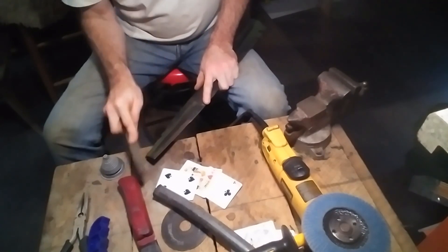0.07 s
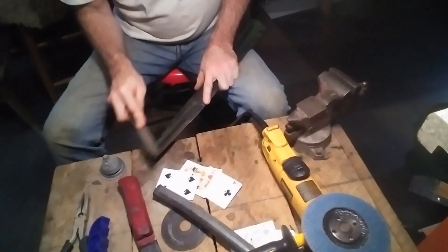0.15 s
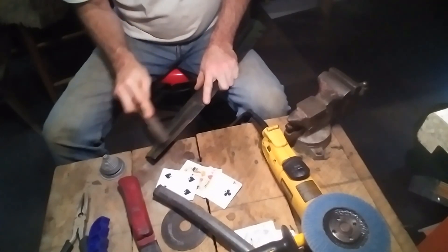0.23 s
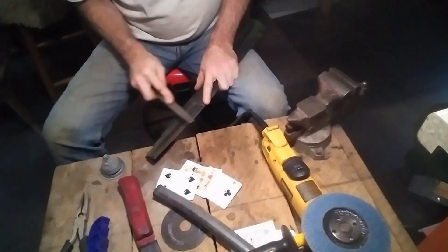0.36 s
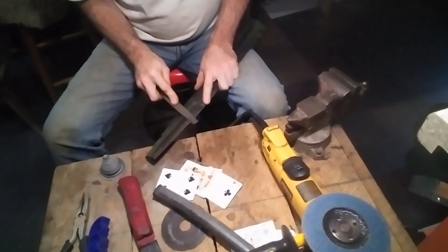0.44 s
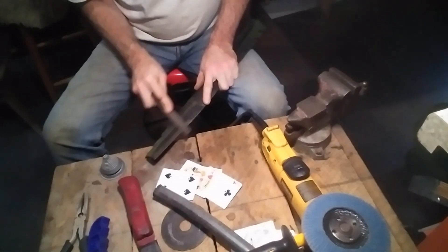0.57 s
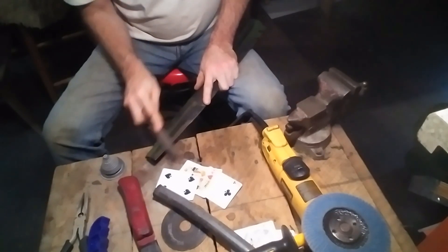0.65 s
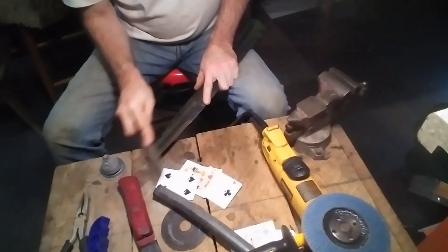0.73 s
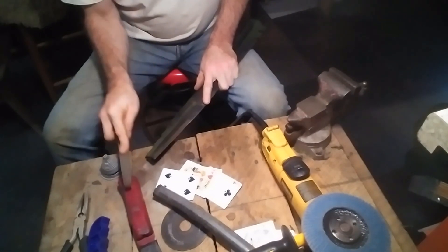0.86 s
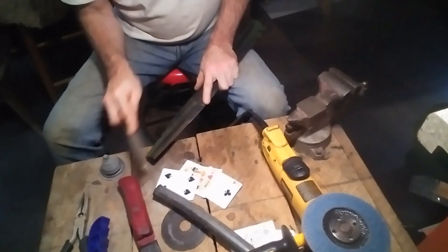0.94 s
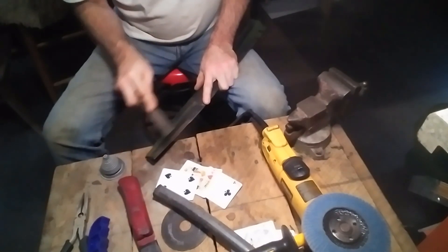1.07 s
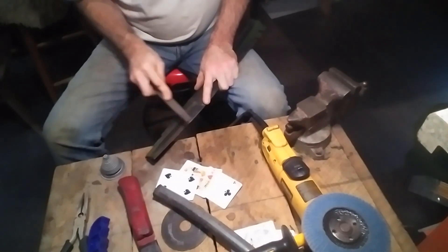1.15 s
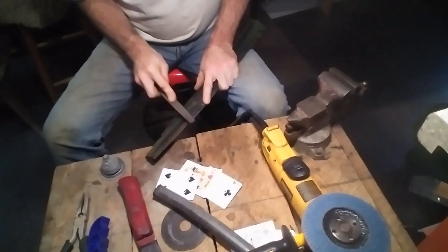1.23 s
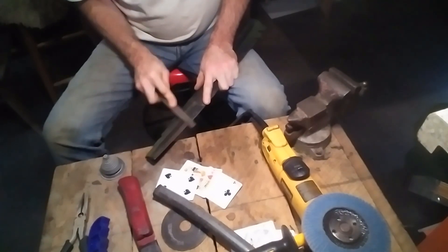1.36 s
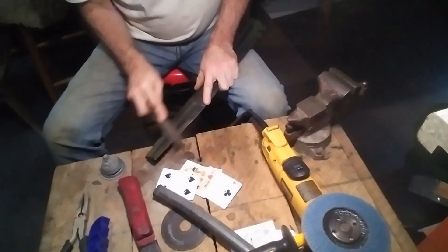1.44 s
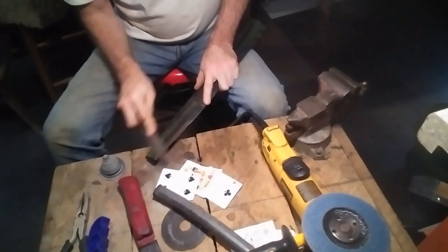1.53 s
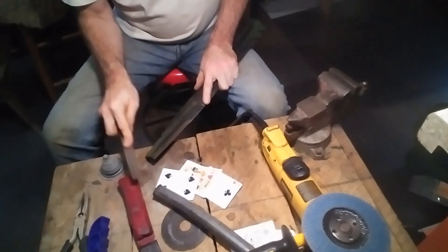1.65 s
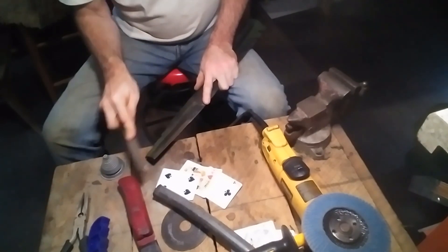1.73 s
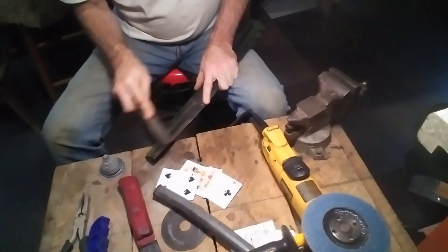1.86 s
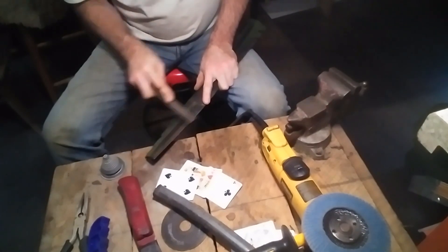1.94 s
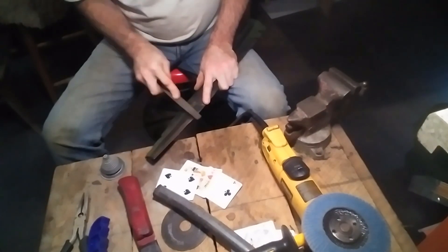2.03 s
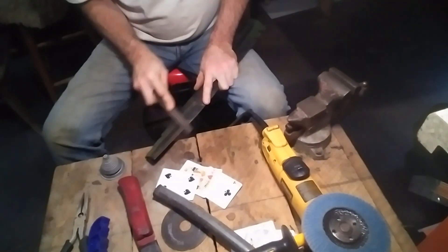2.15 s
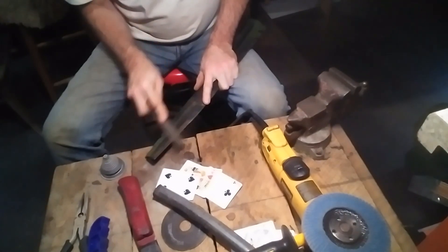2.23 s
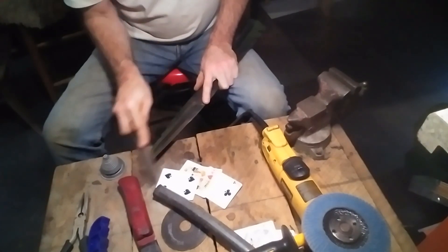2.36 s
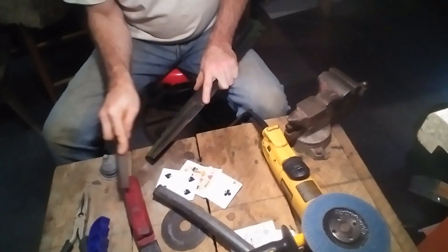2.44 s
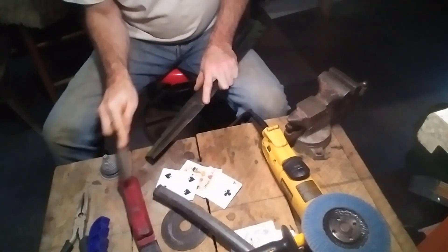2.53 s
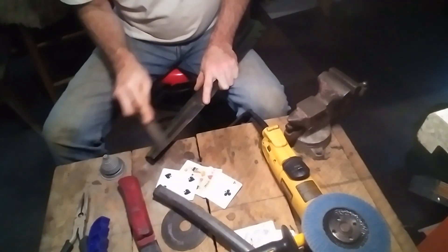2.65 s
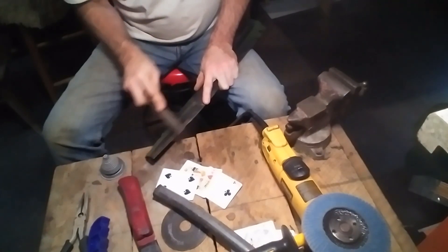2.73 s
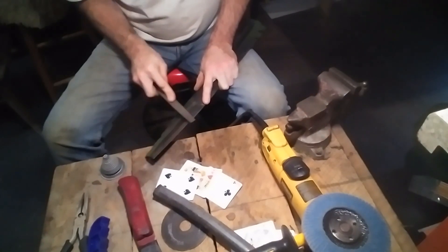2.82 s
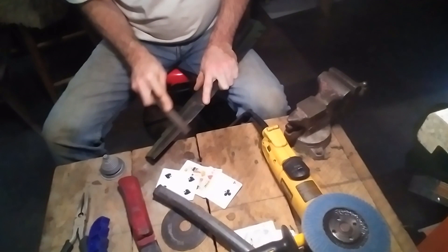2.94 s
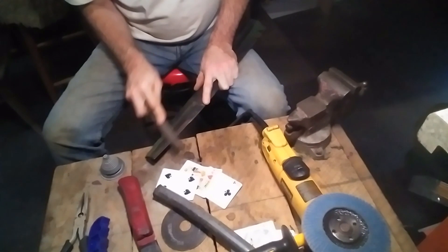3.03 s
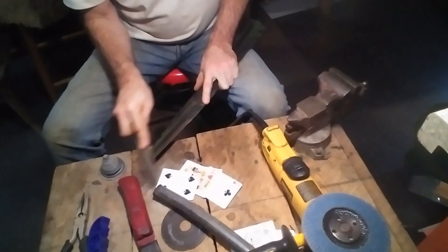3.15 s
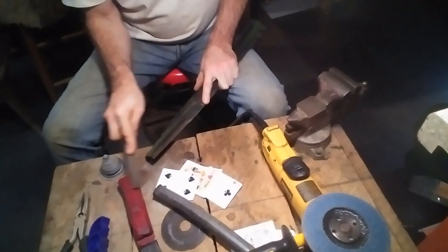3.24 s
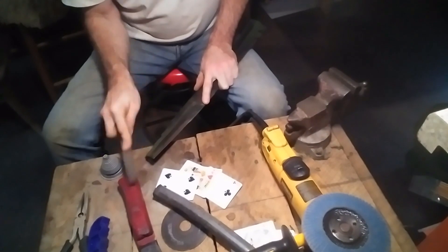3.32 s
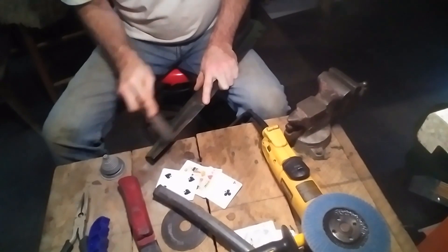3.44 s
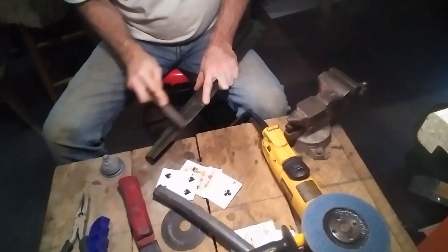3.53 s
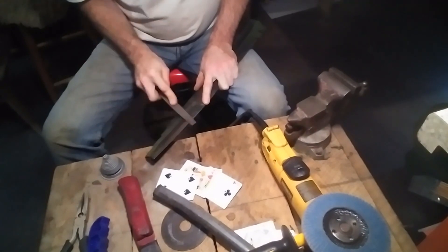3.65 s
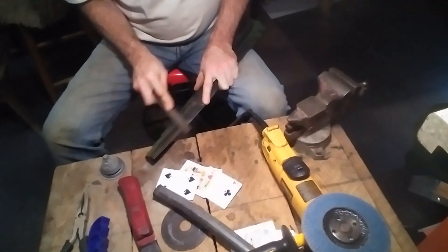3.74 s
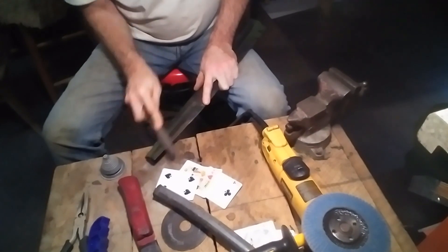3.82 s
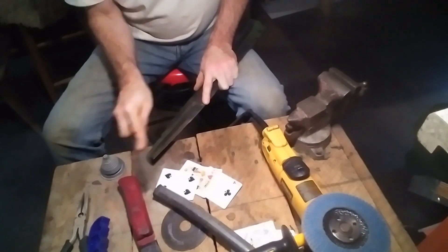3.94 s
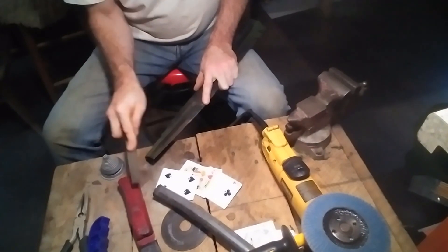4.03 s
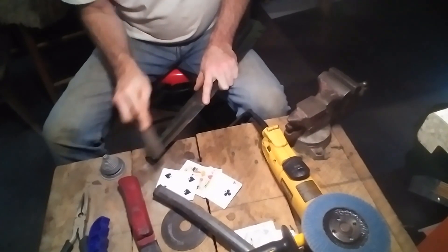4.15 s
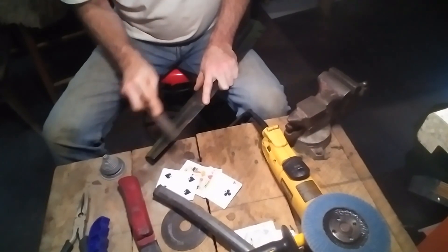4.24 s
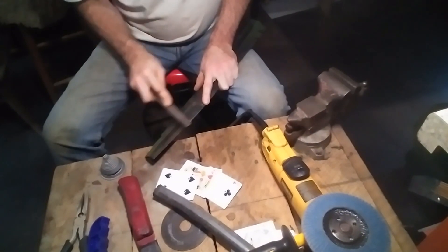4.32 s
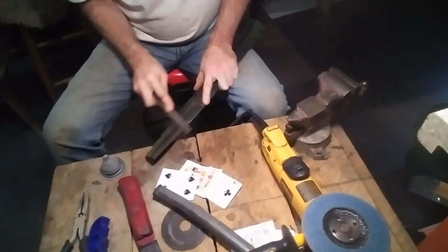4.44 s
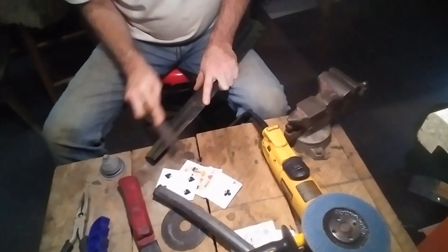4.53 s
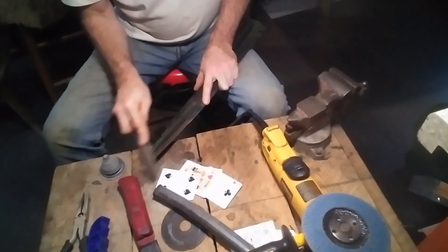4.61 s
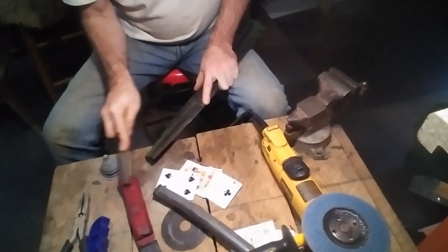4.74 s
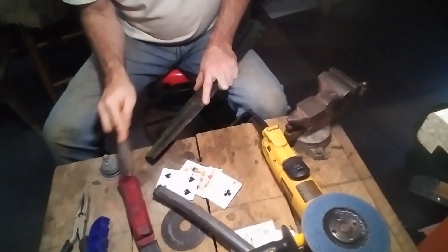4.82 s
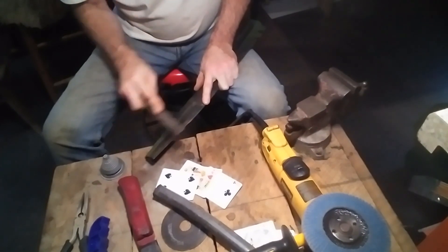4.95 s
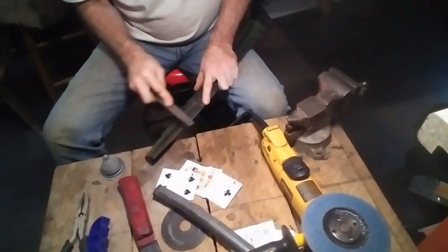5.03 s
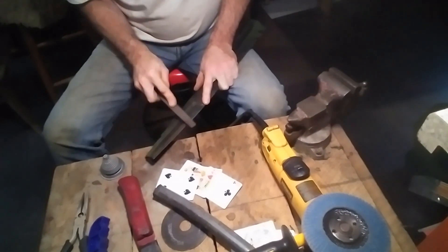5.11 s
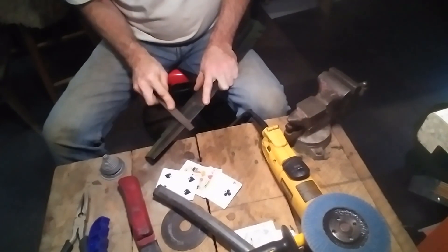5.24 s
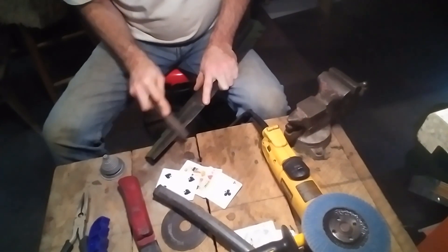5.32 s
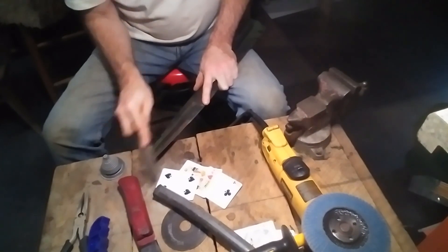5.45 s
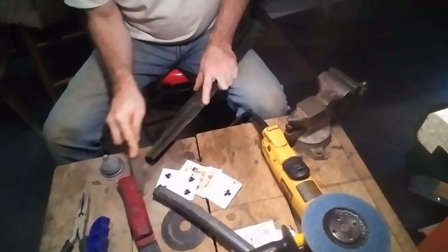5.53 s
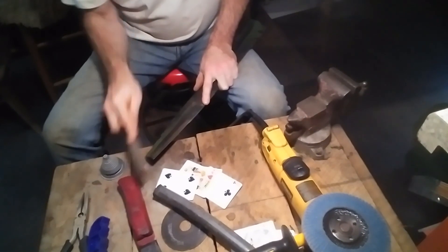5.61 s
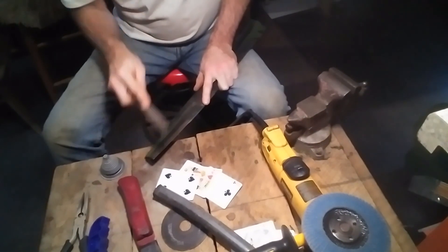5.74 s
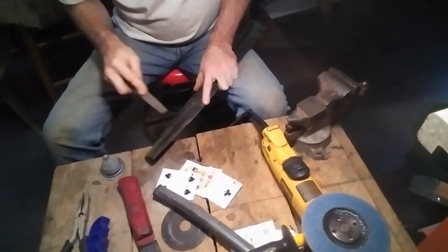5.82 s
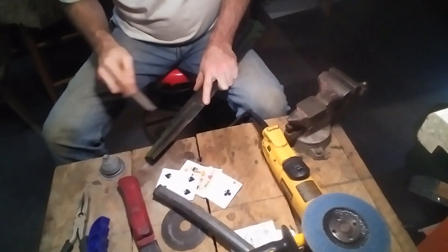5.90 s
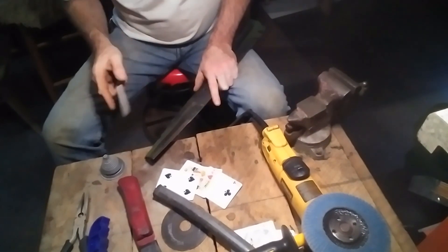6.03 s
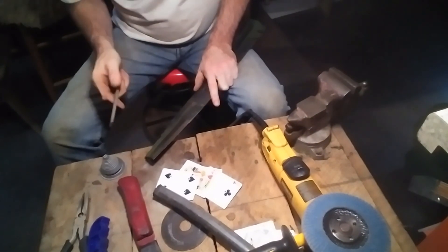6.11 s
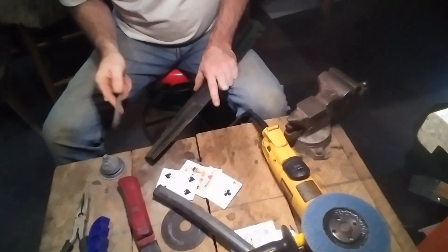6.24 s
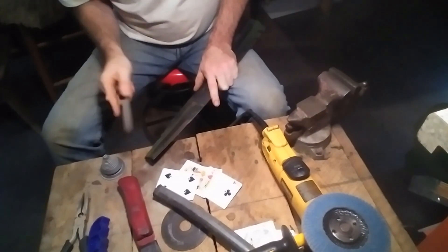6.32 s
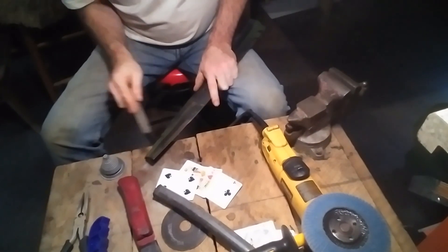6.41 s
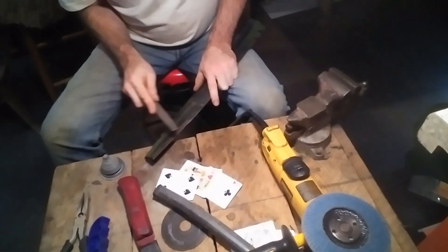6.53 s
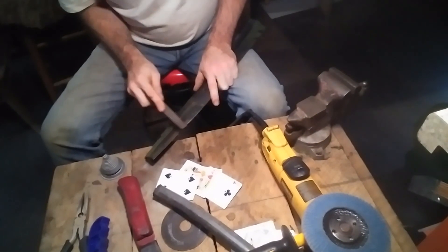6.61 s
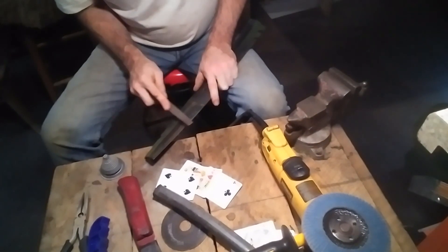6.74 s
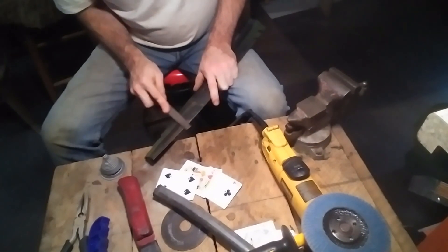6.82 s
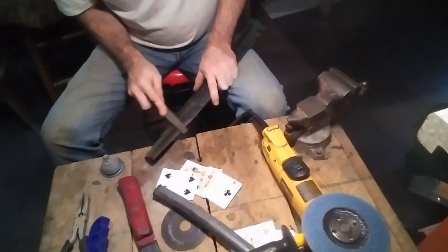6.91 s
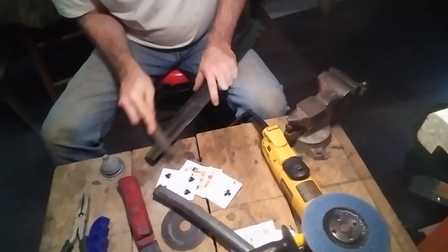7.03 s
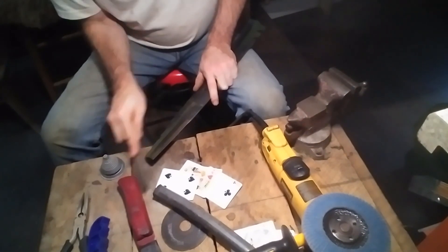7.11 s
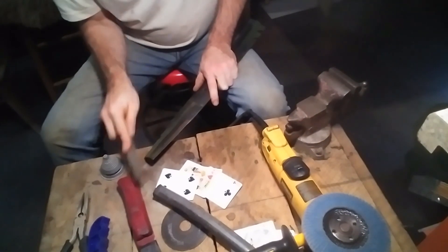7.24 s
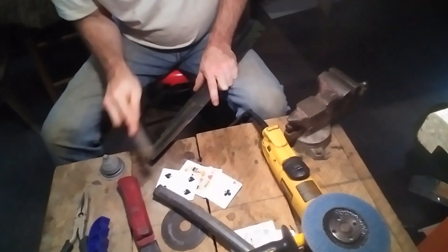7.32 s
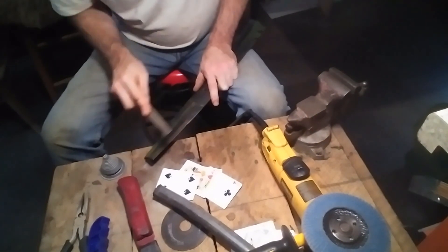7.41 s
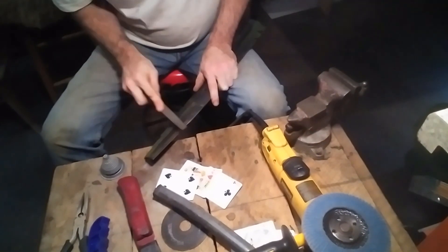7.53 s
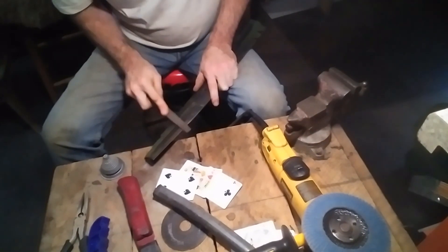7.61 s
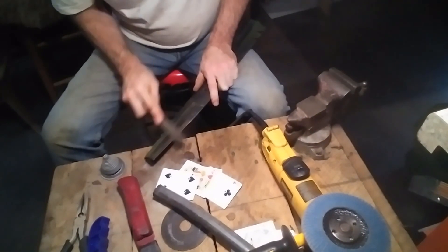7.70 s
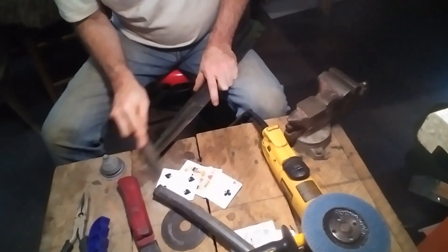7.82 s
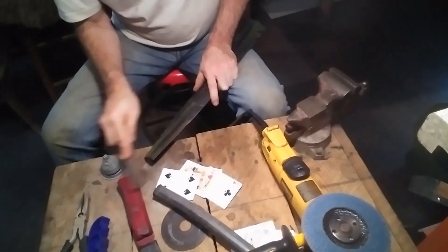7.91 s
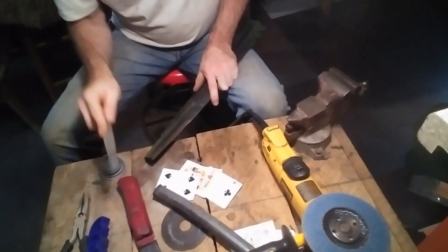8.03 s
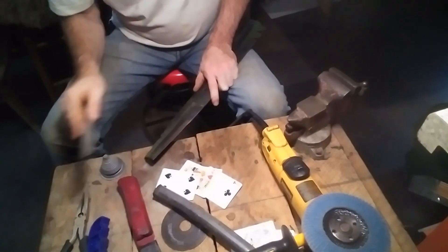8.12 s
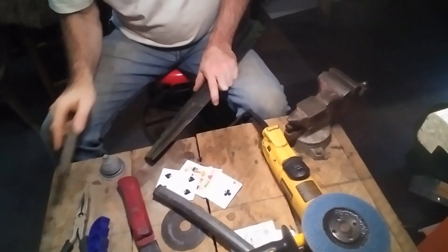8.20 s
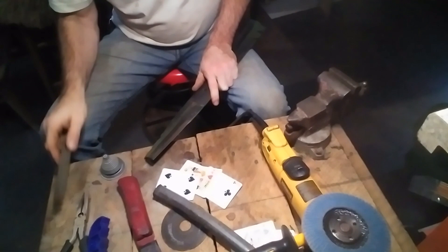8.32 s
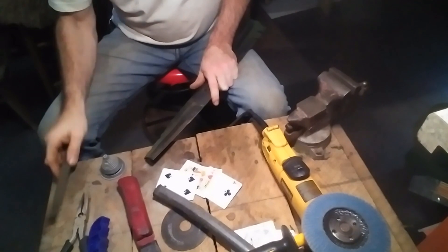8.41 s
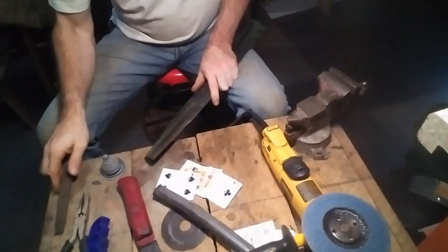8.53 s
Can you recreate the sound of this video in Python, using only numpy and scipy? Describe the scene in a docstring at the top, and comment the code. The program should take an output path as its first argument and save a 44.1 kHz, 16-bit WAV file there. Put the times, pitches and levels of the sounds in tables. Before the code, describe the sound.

A file stroke on a steel blade is already sounding at 0 s, loud and gritty, and ends by about 0.2. Seven more follow at about 0.65, 1.5, 2.3, 3.1, 3.85, 4.6 and 5.4 s, each a sharp steel clack with a tiny rebound, then roughly 0.3 s of dry, bright rasping with a rough mid-high whine and lower growl. Burrs snag, making small jerks. At 5.7 the file slips off with a short ringing clank, and steel knocks wood at 5.8. A pause holds only quiet air, faint cloth rustle and a barely audible tick. At 7.0 filing resumes, lighter then harsher, with a brief chattering squeal at 7.25-7.35, a clank at 7.36 and a duller knock at 7.45. The loudest landing clack, at 7.8, begins the last rasp, ending near 8.1; quiet room air remains. Short small-workshop echo throughout, close microphone, thin in deep bass.

```python
"""Ten rasping file strokes on the edge of a steel blade at a wooden bench; the first is already under way.
The rasp is a rain of tiny clicks into the blade, while two rows of teeth sing and growl at their own pitches.
The other nine land with a clack. Burrs catch the teeth, and once the blade chatters by sticking and slipping.
Twice the file slips off with a clank, then steel knocks on the bench. A sleeve rustles and the handle ticks.
The work echoes in a small workshop, over the noise of still room air."""
import sys
import numpy as np
from scipy import signal
from scipy.fft import rfft, irfft, next_fast_len
from scipy.io import wavfile

SR = 44100
rng = np.random.default_rng(int(sys.argv[2]) if len(sys.argv) > 2 else 0)


def output_pcm(signal):
    """Save a mono or channel-first signal as 16-bit PCM at the path in sys.argv[1].

    Samples are clipped to [-1, 1] before scaling.
    """
    pcm = np.clip(np.atleast_2d(signal).T, -1, 1) * 32767
    wavfile.write(sys.argv[1], SR, np.round(pcm).astype(np.int16))


N = 377665
TIME = np.arange(N) / SR

# pushes of the file: (start t/s, length t/s, rasp level/dB, change under a light hand/dB,
#   hand bears down at share 0-1, hiss level relative to other strokes/dB, song of fine teeth level/dB,
#   song strongest at share 0-1, growl of coarse teeth level/dB, sag of the growl f/Hz, final dig/dB)
STROKES = [ (-.12, 0.28, -27, -6.5, 0.6, -2.5, -25, .5, -24, 130.6, 1.5),
           (.668, 0.3, -31.5, -3.5, .5, -0.5, -26.5, .44, -30, 199.5, 9.5),
           (1.514, .269, -32.5, -5, .3, 0.5, -24.5, .44, -31.5, 79.83, 4.5),
           (2.29, 0.28, -32, 2, 0.4, -4, -26.5, .35, -29, 169.5, -0.5),
           (3.103, 0.27, -31.5, -1, 0.4, -4.5, -25.5, .38, -25.5, 338.7, -2),
           (3.869, .277, -33.5, -2, .45, -3, -23.5, .3, -29.5, 243, 1),
           (4.611, .241, -31.5, -2.5, 0.41, -0.5, -26.5, 0.4, -28, 129.1, 1),
           (5.39, 0.3, -32, -10, .5, .5, -30, .33, -31.5, 99.83, 5.5),
           (7.036, 0.31, -28.5, -16.5, 0.53, -3.5, -33.5, .12, -28.5, 281.3, 2.5),
           (7.82, 0.25, -32.5, -2.5, .38, -3, -31, .4, -32, 29.9, -3), ]
# resonances of the blade, or dead spots where the lift is negative: (f/Hz, width f/Hz, lift/dB)
BLADE = [(172, 21, 6), (230, 5.1, 5), (290, 8.5, 3), (564, 13, -7.5), (663, 130, 11), (770, 19, 11),
         (883, 47, 14.5), (984, 20, 3), (1035, 84, 6), (1206, 210, -13), (1300, 80, 9.5), (1363, 31, 5),
         (1470, 94, 8), (1630, 27, -7.5), (1842, 140, 9.5), (1960, 39, 3.5), (1985, 81, -4.5),
         (2403, 170, 8.5), (2756, 210, 6), (3490, 620, 8), (3967, 260, 11.5), (4470, 200, 5.5),
         (5720, 1100, 6.5), (7010, 60, 2), (7390, 790, 5.5), (8330, 330, 4.5)]
# tone colour of steel being struck: (f/Hz, level/dB)
CLACK = [(50, -29.5), (120, -15), (300, 2.5), (700, -3), (1100, 4), (1600, 7.5), (2700, -3.5), (3800, -7),
         (4900, -9.5), (7400, -6.5), (9500, -14.5), (13000, -28), (16000, -35.5)]


def from_db(db):
    """Decibels to a plain factor."""
    return 10 ** (np.asarray(db) / 20)


def rms_one(x):
    """Scaled to rms (average strength) 1."""
    return x / np.sqrt(np.mean(x ** 2) + 1e-20)


def at_hz(points, hz):
    """A curve over frequency, read on a log-frequency axis."""
    f, value = np.transpose(points)
    return np.interp(np.log(np.maximum(hz, 1)), np.log(f), value)


def band(x, low_hz, high_hz):
    """Keeps the sound between two frequencies (Butterworth band-pass)."""
    edges = [low_hz, min(high_hz, SR / 2 - 1000)]
    return signal.sosfilt(signal.butter(2, edges, "band", fs=SR, output="sos"), x + 1e-18)


def drift(rate):
    """Slow random wandering with rms 1, through `rate` new random points a second."""
    points = rng.standard_normal(N // 8)
    return rms_one(np.interp(TIME * rate, np.arange(len(points)), points))


def bump(x, centre, width):
    """A bell of height 1."""
    return np.exp(-np.minimum(((x - centre) / width) ** 2, 50))


def through(x, response):
    """Sends a sound through an impulse response (convolution), cut to length."""
    return signal.fftconvolve(x, response)[:N]


def body(spectrum, modes=(), size=16384):
    """Impulse response, of energy 1, of a broad spectrum with resonances standing on it."""
    hz = np.fft.rfftfreq(size, 1 / SR)
    level_db = at_hz(spectrum, hz)
    for f, width, lift in modes:
        level_db = level_db + lift / (1 + (2 * (hz - f) / width) ** 2)
    # minimum phase: the response starts at once, with nothing before the blow
    cepstrum = irfft(np.log(from_db(level_db)))[:size // 2]
    response = irfft(np.exp(rfft(2 * cepstrum, size) - cepstrum[0]))[:size // 2]
    return response / np.linalg.norm(response)


def ring(force, modes):
    """Each mode (f/Hz, level/dB, t60/s) rings as a dying sine."""
    t, response = TIME[:SR], 0
    for k, (hz, db, t60) in enumerate(modes):
        response = response + (-1) ** k * from_db(db - 60 * t / t60) * np.sin(2 * np.pi * hz * t)
    return through(force, response)


def impacts(times, levels_db, t60):
    """Each contact is a brief crunch of tiny collisions, falling by 60 dB in t60 seconds."""
    force, age = np.zeros(N), TIME[:SR // 8]
    for s, db in zip(times, levels_db):
        crunch = rng.choice([-1, 1], len(age)) * from_db(db - 60 * age / t60)
        force[int(s * SR):][:len(age)] += crunch
    return force


def pressure(lift_s=0.019, ease_s=0.0075, seat_s=0.04, catch_s=0.0013, flutter_db=1.5, wobble_db=2.0):
    """Force of the file on the edge: on during a stroke, easing off at its end, unsteady, jumping at burrs."""
    # burrs that catch the teeth: (t/s, extra force/dB, length t/s)
    burrs = [(.146, 0.5, 0.0076), (0.903, 3, 0.0081), (1.677, 5.5, 0.0085), (1.744, 4, 0.014),
             (2.403, 0, 0.0056), (3.133, 7.5, 0.0052), (3.186, 2, 0.0042), (3.251, 5.5, 0.011),
             (3.965, 2, 0.015), (4.023, 9, 0.0055), (4.125, 3, 0.0082), (4.744, 11, 0.0049),
             (4.793, 3, 0.005), (5.572, 7, 0.0041), (5.665, 6, 0.017), (7.086, 9, 0.0059),
             (7.164, 8.5, 0.024), (7.297, 8, 0.0042)]
    touching, burr_db = 0, 0
    for s, length, *_ in STROKES:
        touching = touching + np.interp(TIME - s, [-seat_s, 0, length - ease_s, length + lift_s], [0, 1, 1, 0])
    for s, db, length in burrs:
        corners = [s - catch_s, s, s + length / 2, s + 2 * length]
        burr_db = burr_db + np.interp(TIME, corners, [0, db, db, 0])
    return touching ** 2 * from_db(burr_db + flutter_db * drift(170) + wobble_db * drift(35))


def stroke_now():
    """The current stroke's settings at each sample, with its progress, hand speed, lightness and final dig."""
    bear_down_share = 0.11   # part of a stroke over which the hand's weight comes on
    start_speed, fastest_at_share = .76, .58   # speed as a share of the top speed
    rows = np.array(STROKES)
    midway = (rows[:-1, 0] + rows[:-1, 1] + rows[1:, 0]) / 2   # middle of each pause
    names = "start length rasp_db light_db bear_at hiss_db song_db song_at growl_db sag_hz dig_db".split()
    now = dict(zip(names, rows.T[:, np.searchsorted(midway, TIME)]))
    place = now["place"] = np.clip((TIME - now["start"]) / now["length"], 0, 1)
    # the hand's speed follows an arch
    now["speed"] = start_speed + (1 - start_speed) * np.sin(np.pi / 2 * place / fastest_at_share)
    now["light"] = (1 - np.tanh((place - now["bear_at"]) / bear_down_share)) / 2
    now["dig"] = bump(place, .94, .08)   # the file digs in just before it leaves the edge
    return now


def wandering(x, low_hz, high_hz, patchy_db, count):
    """As the contact travels along file and blade it feeds ever different groups of modes; rms 1."""
    size = next_fast_len(N)
    spectrum, hz = rfft(x, size), np.fft.rfftfreq(size, 1 / SR)
    edges, out = np.geomspace(low_hz, high_hz, count + 1), 0
    for low, high in zip(edges, edges[1:]):
        group = irfft(spectrum * (hz >= low) * (hz < high), size)[:N]
        out = out + group * from_db(patchy_db * (drift(35) + drift(140)) / np.sqrt(2))
    return rms_one(out)


def blade_flex(stroke):
    """The blade bends most as the file seats and leaves, a touch less under a light hand; in dB."""
    width_share = 0.082
    seating_db = 9 * bump(stroke["place"], 0, width_share)
    leaving_db = 8 * bump(stroke["place"], 0.97, width_share)
    return -11 + seating_db + leaving_db - 0.5 * stroke["light"]


def rasp(force, stroke, chips_per_s=5000, spread_db=2.5, sway_db=-18.0, scrape_db=-2.5, hiss_db=-2.0,
         hiss_per_speed_db=20.0, middle_db=-6, flex_db=-1.0, dig_share=0.51):
    """Teeth tear off tiny chips; every break is a click into the blade. A faster hand sounds brighter."""
    # tone colour of a breaking chip: (f/Hz, level/dB)
    rasp_colour = [(50, -31.5), (110, -14), (180, -11.5), (350, 3.5), (600, -1), (1000, -1.5), (1500, 1.5),
                   (2600, 3), (3700, 0.5), (4900, -6), (7400, 1), (9500, -8.5), (13000, -23.5),
                   (16000, -27.5)]
    level_db = stroke["rasp_db"] + stroke["light_db"] * stroke["light"]
    level_db = level_db + dig_share * stroke["dig_db"] * stroke["dig"]
    hiss_rel = stroke["hiss_db"] + hiss_per_speed_db * (stroke["speed"] - 1)
    flex_rel = blade_flex(stroke)
    sizes = from_db(spread_db * np.minimum(rng.exponential(1, N), 4)) * rng.choice([-1, 1], N)
    chips = sizes * (rng.random(N) < chips_per_s / SR)
    steel = through(chips, body(rasp_colour, BLADE))
    flex = from_db(flex_db + flex_rel) * rms_one(band(steel, 140, 900))
    sway = from_db(sway_db + flex_rel) * rms_one(band(steel, 155, 205))   # the whole blade sways
    middle = from_db(middle_db) * wandering(steel, 900, 2200, patchy_db=2.0, count=3)
    scrape = from_db(scrape_db) * wandering(steel, 2200, 5000, patchy_db=2.3, count=5)
    hiss = from_db(hiss_db + hiss_rel) * wandering(steel, 5000, 17000, patchy_db=3.2, count=10)
    return force * from_db(level_db) * (flex + sway + middle + scrape + hiss)


def tooth_row(hz, level_db, jitter, rough_db, overtone_db, patchy_db, lock=.4, firm_db=-31):
    """Evenly spaced teeth cross the edge at a given rate; a firm bite is louder and steadier."""
    # how strongly the teeth drive the blade: (f/Hz, level/dB)
    tooth_drive = [(100, -31.5), (450, -10), (900, 3), (5000, -4)]
    level_db = level_db + patchy_db * drift(45)
    unsteady = jitter * np.clip(from_db(lock * (firm_db - level_db)), .5, 2)
    phase = 2 * np.pi * np.cumsum(hz * (1 + unsteady * drift(900))) / SR
    push = np.sin(phase) + from_db(overtone_db) * np.sin(2 * phase)
    push = push * from_db(rough_db * drift(500))
    damped = [(f, width, lift / 2) for f, width, lift in BLADE]   # the biting teeth damp the blade
    return from_db(level_db) * rms_one(through(push, body(tooth_drive, damped)))


def singing_teeth(force, stroke, firmest=1.6, fine_db=-5.5, coarse_db=-2.5):
    """The fine row's pitch follows the hand's speed; the coarse row's growl falls and sags under load."""
    place, light, dig = stroke["place"], stroke["light"], stroke["dig"]
    # fine row: rate at top speed, then its levels outside its song
    fine_teeth_hz, fine_rest_db, fine_dig_db = 2015, -38.5, -37
    rest_db = fine_rest_db + stroke["light_db"] * light
    song_db = rest_db + (stroke["song_db"] - rest_db) * bump(place, stroke["song_at"], .23)
    song_db = song_db + (fine_dig_db + stroke["dig_db"] - fine_rest_db) * dig
    fine = tooth_row(fine_teeth_hz * stroke["speed"], fine_db + song_db,
                     jitter=0.043, rough_db=4.5, overtone_db=-23.5, patchy_db=2.5)
    # coarse row: under a light hand it changes with the rasp and drops a further 3 dB; it takes a moment to build
    growl_hz = 1528 - 170.5 * place - stroke["sag_hz"] * bump(place, .74, .17)
    growl_db = stroke["growl_db"] + (stroke["light_db"] - 3) * light + stroke["dig_db"] * dig
    growl_db = growl_db - 10 * bump(place, 0, .15)
    coarse = tooth_row(growl_hz, coarse_db + growl_db,
                       jitter=.11, rough_db=4.0, overtone_db=-18.5, patchy_db=2.0)
    # the teeth need a firm bite to sing, and skid past a certain force
    bite = np.minimum(force * np.minimum(force, 1), firmest)
    return bite * (fine + coarse)


def room_air(level_db=-63):
    """Still room air: steady noise with its own tone colour."""
    # tone colour of the air: (f/Hz, level/dB)
    air_colour = [(15, -61.5), (25, -32.5), (70, -5), (223, -7.5), (344, -1), (503, -16), (560, -5),
                  (624, -16.5), (714, -13), (1040, -15.5), (1130, -20), (2910, -22.5), (5140, -32),
                  (14800, -29), (16000, -40)]
    return from_db(level_db) * through(rng.standard_normal(N), body(air_colour))


def sleeve(rest_db=-69.5, rustle_width_s=0.079, flutter_db=2.0):
    """Cloth rubs as soft noise, swelling when the arm swings back."""
    # swings of the arm: (t/s, level/dB)
    rustles = [(0.519, -69), (1.45, -64), (2.02, -62.5), (2.721, -60.5), (3.03, -68.5), (3.58, -64.5),
               (3.81, -57.5), (4.499, -60), (5.091, -57.5), (5.289, -57), (6.14, -62.5), (6.551, -64),
               (6.82, -63.5), (7.75, -72), (8.52, -67)]
    # tone colour of the cloth: (f/Hz, level/dB)
    cloth_colour = [(80, -15.5), (160, -1.5), (350, 1.5), (900, -2.5), (2000, -12), (3600, -21),
                    (5000, -37), (12000, -44)]
    arm = from_db(rest_db)
    for s, db in rustles:
        arm = arm + from_db(db) * bump(TIME, s, rustle_width_s)
    return arm * from_db(flutter_db * drift(45)) * through(rng.standard_normal(N), body(cloth_colour))


def landings(rebound_s=0.0042, knock_t60=0.037, t60=0.022, knock_db=-2.5, clack_db=-9.0, tick_db=1.5):
    """The file strikes the edge and rebounds once before it bites; the low knock lasts longest."""
    # the file lands: (t/s, overall level/dB, then relative to it: low knock/dB, bright tick/dB, rebound/dB)
    touchdowns = [(0.6384, -4, -14, -15, 2), (1.4817, -4.5, -13, -13.5, 2.5), (2.2607, -2.5, -14, -11, -5),
                  (3.0743, -3, -11, -2, -2.5), (3.8368, -6, -11.5, -20.5, 3),
                  (4.5835, -0.5, -12.5, -4.5, -3), (5.3631, -3.5, -10, -6.5, -3),
                  (7.0074, -1.5, -10.5, -16.5, -10.5), (7.787, 4, -16.5, -13, -5.5)]
    s, peak_db, knock_rel, tick_rel, rebound_db = np.transpose(touchdowns)
    # parts of the clack: (lowest f/Hz, highest f/Hz, level/dB, t60/s)
    parts = [(70, 1500, knock_db + knock_rel, knock_t60), (2350, 5400, clack_db, t60),
             (5000, 25000, tick_db + tick_rel, t60)]
    out = 0
    for low_hz, high_hz, db, decay in parts:
        strike = impacts(s, peak_db + db, decay)
        rebound = impacts(s + rebound_s, peak_db + db + rebound_db, decay)
        out = out + band(strike + rebound, low_hz, high_hz)
    return through(out, body(CLACK, BLADE))


def ticks(t60=.12):
    """The handle shifts in the grip between strokes, with a faint tick."""
    # shifts of the handle: (t/s, level/dB)
    shifts = [(1.398, -47), (3.801, -48), (6.104, -55), (7.758, -39.5)]
    s, db = np.transpose(shifts)
    return band(impacts(s, db, t60), 500, 2500)


def slips(clack_db=-1.0, ring_db=-45.5, dull_hz=4500):
    """The file drops off the edge and, now free, rings on."""
    # slips off the edge: (t/s, level/dB)
    drops = [(5.722, -15.5), (7.3598, -14.5)]
    # ringing of the file: (f/Hz, level/dB, t60/s)
    file_modes = [(800, -9, 0.15), (1335, -24, 0.11), (1868, -22.5, .1), (2575, 3, 0.12),
                  (2624, 13.5, 0.12), (4037, -22, .12), (4240, -23, .12), (4813, -22, .1)]
    s, peak_db = np.transpose(drops)
    force = impacts(s, peak_db, t60=0.073)
    clank = through(band(force, 200, dull_hz), body(CLACK, BLADE))
    return from_db(clack_db) * clank + from_db(ring_db) * ring(force, file_modes)


def knocks(ring_db=-3.5, thud_db=19.0, crack_db=-2.5):
    """Steel meets the wooden top; a softer touch leaves out the high modes."""
    # knocks on the bench: (t/s, level/dB, hardness as highest f/Hz)
    blows = [(5.8317, -23.5, 2430), (7.4521, -25.5, 570)]
    # ringing of the bench with the steel on it: (f/Hz, level/dB, t60/s)
    bench_modes = [(135, -8, .16), (155.6, -5, 0.15), (209, -1, 0.11), (238, -7, 0.17), (301.5, -8.5, 0.42),
                   (333, -15, 0.19), (445, -2, 0.083), (541, -6, 0.076), (850, -5, 0.1), (900, -3, 0.092),
                   (1190, -8, 0.081), (1490, -13, 0.11), (1870, 6.5, 0.035), (2700, -4, 0.08),
                   (3130, -12, 0.098)]
    out = 0
    for s, db, hardness_hz in blows:
        blow = from_db(db + ring_db) * signal.unit_impulse(N, int(s * SR))
        thud = band(impacts([s], [db + thud_db], t60=0.12), 250, 567)
        crack = band(impacts([s], [db + crack_db], t60=0.12), 270, 3350)
        out = out + band(ring(blow, bench_modes) + thud + crack, 125, hardness_hz)
    return out


def chatter(gain_db=1.5, third_db=-13, half_db=-17, jitter=0.036, surge_db=3.5):
    """Stick and slip lock on to a blade mode in surges; alternate slips differ, adding the octave below."""
    # path of the squeal: (t/s, f/Hz, level before the gain/dB)
    squeal_path = [(7.245, 1360, -32), (7.257, 1368, -24.5), (7.309, 1349, -18), (7.352, 1320, -35.5)]
    s, path_hz, path_db = np.transpose(squeal_path)
    hz, level_db = np.interp(TIME, s, path_hz), np.interp(TIME, s, path_db)
    phase = 2 * np.pi * np.cumsum(hz * (1 + jitter * drift(600))) / SR
    squeal = np.sin(phase) + from_db(third_db) * np.sin(3 * phase) + from_db(half_db) * np.sin(phase / 2)
    sticking = (TIME > s[0]) * (TIME < s[-1])
    return squeal * from_db(level_db + gain_db + surge_db * drift(130)) * sticking


def workshop(x, wet_db=-5.5, first_echo_s=0.003):
    """Dense reflections from bench and walls: noise in nine bands, each dying at its own pace."""
    # reverberation of the workshop: (f/Hz, t60/s)
    reverb_times = [(110, .6), (220, 0.33), (450, 0.36), (1200, .25), (4000, 0.28), (8000, 0.23),
                    (15000, 0.25)]
    t, tail = TIME[:SR * 3 // 4], 0
    edges = np.geomspace(40, 20000, 10)
    white, hz = rfft(rng.standard_normal(len(t))), np.fft.rfftfreq(len(t), 1 / SR)
    for low, high in zip(edges, edges[1:]):
        noise = irfft(white * (hz >= low) * (hz < high), len(t))
        tail = tail + noise * from_db(-60 * t / at_hz(reverb_times, np.sqrt(low * high)))
    tail = tail * (t > first_echo_s)
    return x + from_db(wet_db) * through(x, tail / np.linalg.norm(tail))


def scene():
    """The work at the bench echoes in the room; air and sleeve are added without echo."""
    force, stroke = pressure(), stroke_now()
    work = rasp(force, stroke) + singing_teeth(force, stroke)
    work = work + landings() + ticks() + slips() + knocks() + chatter()
    return (workshop(work) + room_air() + sleeve())[None]


def record(dry):
    """The small microphone loses the deep bass; the top is cut steeply."""
    dry = signal.sosfilt(signal.butter(2, 42, "high", fs=SR, output="sos"), dry)
    return signal.sosfilt(signal.ellip(10, .1, 80, 16100, fs=SR, output="sos"), dry)


dry = scene()
out = record(dry)
output_pcm(out)
```